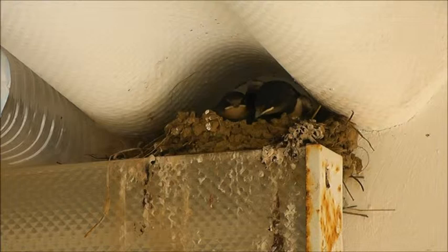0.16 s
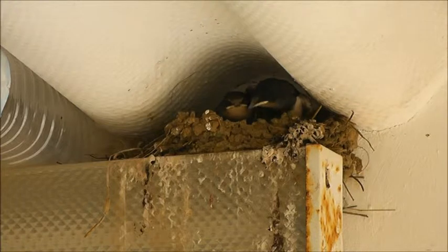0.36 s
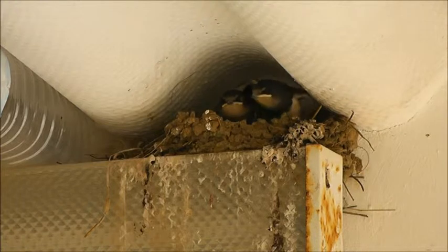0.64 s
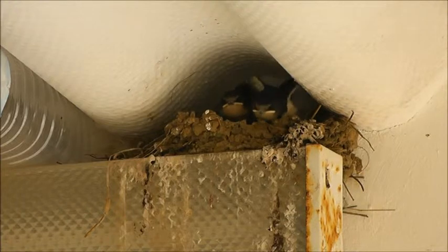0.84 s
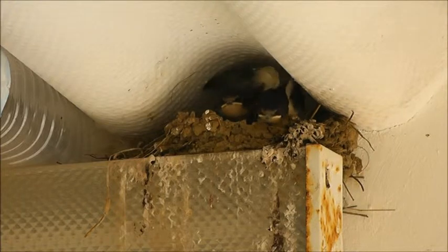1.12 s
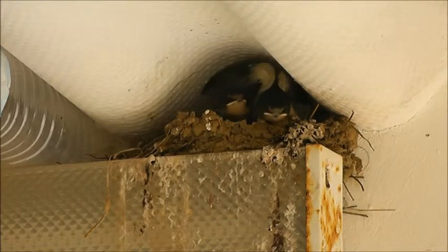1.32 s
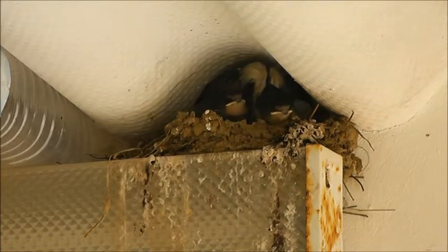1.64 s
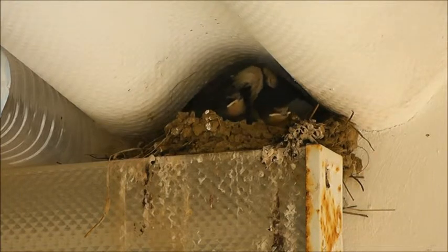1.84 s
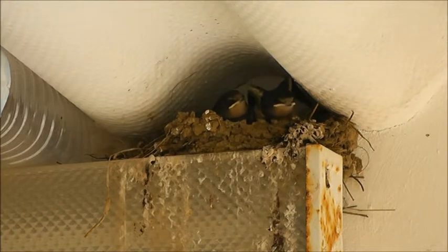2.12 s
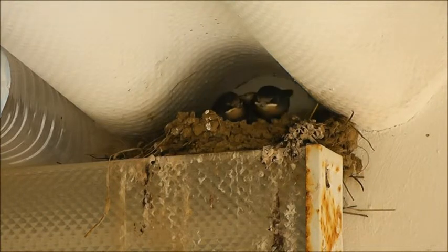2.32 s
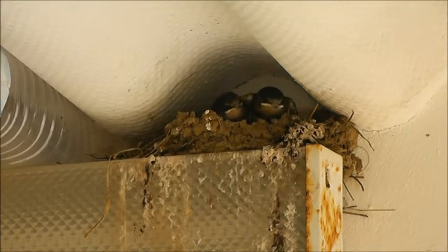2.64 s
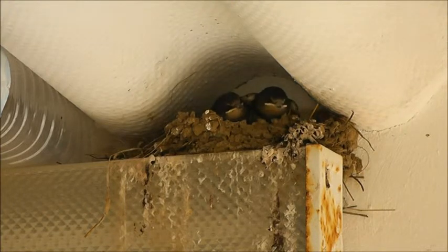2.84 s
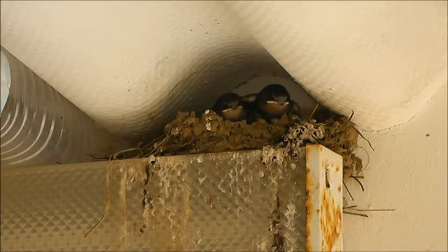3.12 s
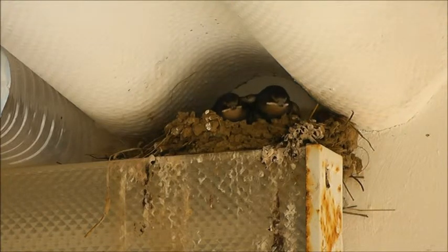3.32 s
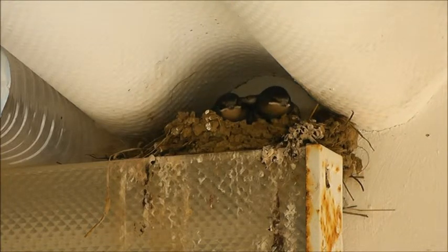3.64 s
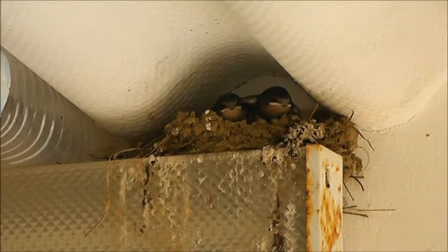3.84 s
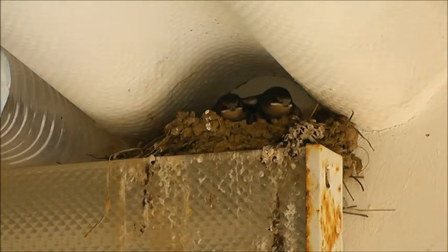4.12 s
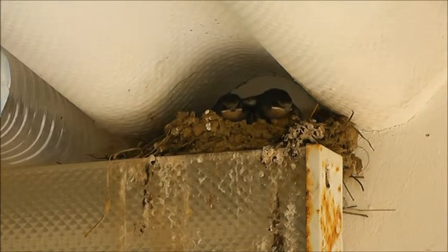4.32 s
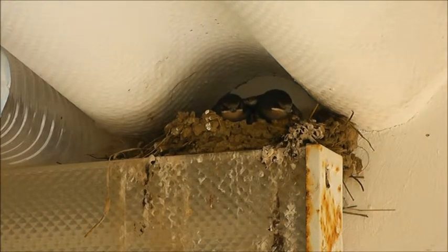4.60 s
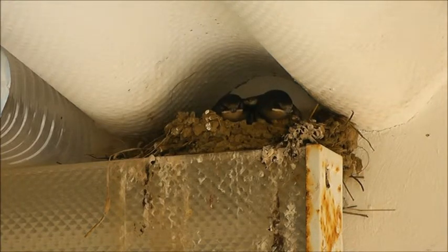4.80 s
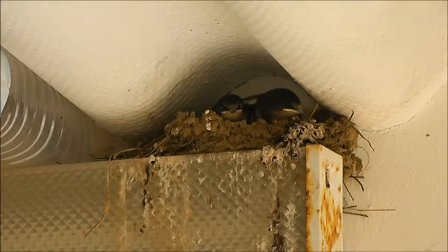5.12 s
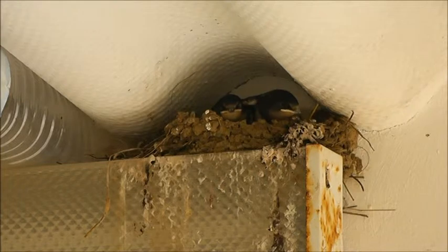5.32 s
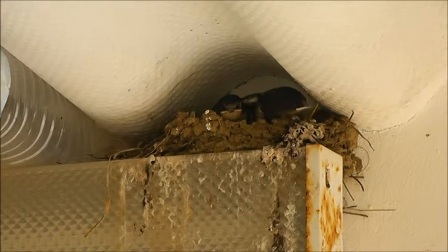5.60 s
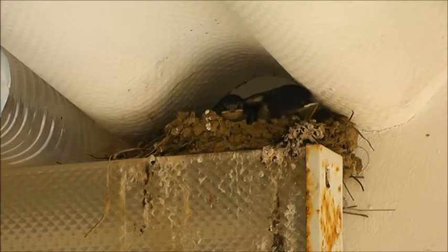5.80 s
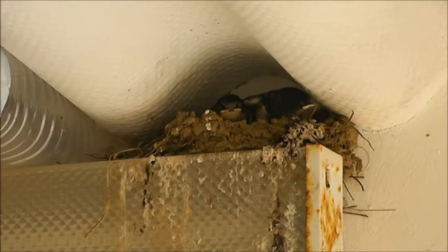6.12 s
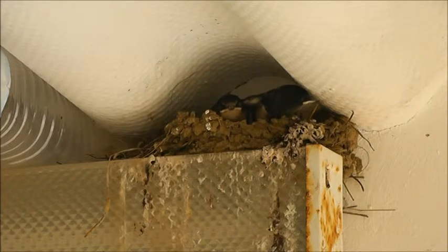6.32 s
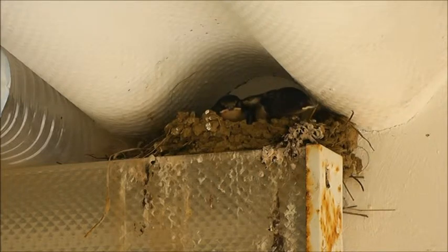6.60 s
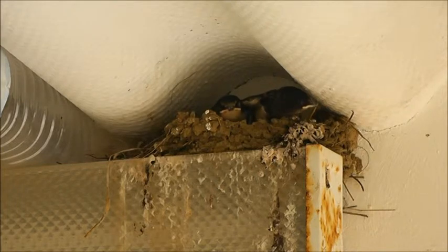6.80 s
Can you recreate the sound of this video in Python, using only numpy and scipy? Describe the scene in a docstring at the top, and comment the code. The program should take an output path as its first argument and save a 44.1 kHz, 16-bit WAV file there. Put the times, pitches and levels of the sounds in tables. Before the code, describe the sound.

Close to a swallows' mud nest under a roof, a bird gives four short, sharp upward chirps, spaced more than a second apart, with faint dry nest rustles. Farther away a small bird sings quick falling notes and a thin buzz, while one soft low thump sounds. After the fourth chirp, a fast raspy twitter of squeaks, pips and gurgles runs to the end. Hard walls add a short ring over quiet outdoor rumble and hiss.

```python
"""Outdoors, a quiet rumble and hiss of coloured noise; close by, swallows at a mud nest under a corrugated roof.
An adult gives four sharp rising calls, each a rasp breaking into two whistles that mix; the nest rustles.
Farther off a small bird sings gliding down-slurs, then a swept buzz; one soft low thump of noise and boom falls.
After the fourth call a fast raspy twitter runs: chopped whistles, pips, squeaks and gurgles.
The hard porch walls add a short ring of decaying noise bands."""
import sys
import numpy as np
from scipy import signal
from scipy.fft import rfft, irfft
from scipy.io import wavfile
from scipy.ndimage import uniform_filter1d

SR = 44100
rng = np.random.default_rng(int(sys.argv[2]) if len(sys.argv) > 2 else 0)


def put_to_file(sound):
    """Save the sound as 16-bit audio at rate SR, in the file named by the first command-line argument."""
    columns = np.atleast_2d(sound).T  # one column per channel
    safe = np.clip(columns, -1, 1)
    whole_steps = np.round(safe * 32767)
    wavfile.write(sys.argv[1], SR, whole_steps.astype(np.int16))


N = 306495
TIME = np.arange(N) / SR
CUTOFF_HZ = 15650
MID_SIDE = np.array([[1], [-1]])   # a side signal enters left and right with opposite sign


def from_db(db):
    """Decibels to gain."""
    return 10 ** (np.asarray(db) / 20)


def rms_one(x):
    """Scale to unit rms."""
    return x / np.sqrt(np.mean(x ** 2) + 1e-20)


def at_hz(points, hz):
    """Read a table on a log-frequency axis."""
    f, value = np.transpose(points)
    return np.interp(np.log(np.maximum(hz, 1)), np.log(f), value)


def wander(rate_hz):
    """Smooth random motion with spread 1."""
    return rms_one(signal.sosfilt(signal.butter(2, rate_hz, fs=SR, output="sos"), rng.standard_normal(N)))


def noise(spectrum, grain_db=0):
    """Unit noise with a given colour, from a source that may sputter."""
    source = rng.standard_normal(N)
    if grain_db:
        source = source * from_db(grain_db * np.tanh(wander(300)))
    colour = from_db(at_hz(spectrum, np.fft.rfftfreq(N, 1 / SR)))
    return rms_one(irfft(rfft(source) * colour, N))


def span(start, end):
    """The samples between two times."""
    return slice(max(int(start * SR), 0), min(int(end * SR), N))


def phase_of(hz):
    """Running phase of a moving pitch."""
    return 2 * np.pi * np.cumsum(hz) / SR


def gate(start, end, edge_s):
    """Swell in, hold, die away."""
    return np.clip(np.minimum(TIME - start, end - TIME) / edge_s + .5, 0, 1)


def pips(rows, arch, jitter, octave_db):
    """Near-pure notes whose pitch arches with the blowing pressure; low ones are rougher."""
    out, shake = np.zeros(N), wander(560)
    for centre, length, hz, db in rows:
        part = span(centre - length, centre + length)
        u = (TIME[part] - centre) / (length / 2)
        rough = jitter * max(3800 / hz, 1) ** 2.87
        phase = phase_of(hz * (1 - arch * u ** 2 + rough * shake[part]))
        tone = np.sin(phase)
        tone = tone + from_db(octave_db) * np.sin(2 * phase)
        tone = tone + from_db(octave_db - 24) * np.sin(3 * phase)
        envelope = np.exp(-1.3 * np.abs(u) ** 3)
        out[part] += np.sqrt(2) * from_db(db) * envelope * tone
    return out


# colour of the open air beyond the porch: (f/Hz, relative level/dB)
AIR_COLOUR = [(15, -51), (25, -40), (39, -13.5), (96, -4.5), (193, -7), (322, -2.5), (631, -9.5), (703, -9),
              (1300, -13), (1450, -14.5), (2120, -15.5), (2700, -18.5), (4750, -15.5), (10100, -31.5),
              (15500, -39.5)]
# how alike the two microphones hear it: (f/Hz, left-right correlation)
AIR_LIKENESS = [(30, .15), (100, 0.011), (500, 0.017), (2000, 0.4), (5000, 1), (14000, 0.4)]
AIR_DB = -57.5   # level of the part common to both sides


def outdoors():
    """Steady distant rumble and hiss, wide in the bass."""
    alike = np.clip(at_hz(AIR_LIKENESS, np.fft.rfftfreq(N, 1 / SR)), -.9, .99)
    side = irfft(rfft(noise(AIR_COLOUR)) * np.sqrt((1 - alike) / (1 + alike)), N)
    return from_db(AIR_DB) * (noise(AIR_COLOUR) + side * MID_SIDE)


# near calls, one whistle from each side of the syrinx, levels before shaping and mix:
# (top t/s, glide t/s, low top f/Hz, high top f/Hz, low level/dB, high level/dB, rasp level/dB)
SHARP_CALLS = [ (0.211, .050, 3010, 4210, -34.5, -38, -41), (1.811, 0.063, 3050, 4112, -36, -27.5, -37.5),
               (3.100, .042, 3200, 4287, -28.5, -23.5, -33.5), (4.545, 0.042, 3240, 4340, -31, -19, -34.5)]
# colour of their rasp: (f/Hz, relative level/dB)
CALL_RASP_COLOUR = [(500, -22), (1100, -4.5), (1700, -8.5), (2400, -2), (3300, 6), (4400, 9), (5600, 0),
                    (7200, -6), (8500, -21), (11000, -23), (13500, -15), (15500, -43)]
# tones that the two whistles make together: (multiple of low, multiple of high, relative level/dB)
COMBINATION_TONES = [ (-1, 1, -18), (2, 0, -5.5), (-1, 2, -10), (1, 1, -10), (0, 2, -27.5), (3, 0, -20.5),
                     (2, 1, -28.5), (1, 2, -23), (0, 3, -24)]
LOW_START, HIGH_START = .73, .785   # each whistle starts at this share of its top pitch
USUAL_CALL_DB = -26   # reference for the high whistle
MIX_DB, MIX_FOLLOWS = -35, .17   # combination tones in a usual call; share of the call's level each order follows


def sharp_calls(swell_db, fade_s, jitter, lead_s, rasp_rise_s, throb):
    """A rasp breaks into two rising whistles, which mix into sum and difference tones."""
    out, rasp = np.zeros(N), noise(CALL_RASP_COLOUR, grain_db=10.5)
    low_shake, high_shake = wander(240), wander(330)
    for top, glide, low_top, high_top, low_db, high_db, rasp_db in SHARP_CALLS:
        part = span(top - .13, top + .05)
        t = TIME[part] - top
        climb = np.clip(1 + t / glide, 0, 1)
        bend = np.sin(np.pi / 2 * climb ** 1.08) ** 2
        low_hz = low_top * (LOW_START + (1 - LOW_START) * bend)
        high_hz = high_top * (HIGH_START + (1 - HIGH_START) * bend)
        low = phase_of(low_hz * (1 + jitter * low_shake[part]))
        high = phase_of(high_hz * (1 + jitter * high_shake[part]))
        # a harder call is brighter
        push_db = high_db - USUAL_CALL_DB
        mixed = sum(from_db(MIX_DB + db + MIX_FOLLOWS * push_db * (m + n)) * np.sin(round(m) * low + round(n) * high)
                    for m, n, db in COMBINATION_TONES)
        pair = from_db(low_db) * np.sin(low) + from_db(high_db) * np.sin(high)
        swell = from_db(-swell_db * (1 - climb) ** 2)
        # every other beat of the pair is stronger, which sets lines halfway between the tones
        voice = (swell * pair + mixed) * (1 + throb * np.sin((high - low) / 2))
        onset = np.exp(-(np.minimum(t + glide - .006, 0) / 0.011) ** 2)
        opening = np.clip((t + glide + lead_s) / rasp_rise_s, 0, 1)
        release = np.exp(-(np.maximum(t, 0) / fade_s) ** 2)
        out[part] += release * (np.sqrt(2) * onset * voice + from_db(rasp_db) * opening * rasp[part])
    return out


TICK_AHEAD_S, TICK_S, TICK_HZ = .077, .006, 4250
TICK_DB, TICK_FOLLOWS = -44, 0.56   # level before a usual call; share of the call's level it follows


def call_ticks():
    """A tiny pip announces each sharp call: (centre t/s, length t/s, f/Hz, level/dB)."""
    return [(top - TICK_AHEAD_S, TICK_S, TICK_HZ, TICK_DB + TICK_FOLLOWS * (high_db - USUAL_CALL_DB))
            for top, *_, high_db, _ in SHARP_CALLS]


# thin whistles of the farther bird: (centre t/s, length t/s, f/Hz, level/dB before ring and mix)
FAR_WHISTLES = [(0.395, 0.028, 3680, -67), (0.435, 0.046, 4100, -58.5), (0.945, 0.018, 4730, -54),
                (1.226, 0.042, 6400, -53), (1.478, 0.035, 5200, -49), (2.048, 0.035, 7060, -51.5),
                (2.076, 0.05, 4470, -42.5), (2.445, 0.11, 5275, -49.5), (2.545, 0.024, 5470, -43),
                (2.588, .014, 5400, -52), (2.770, .03, 5250, -42), (4.19, 0.15, 2190, -66),
                (4.27, .09, 3370, -70)]


def far_whistles():
    """The farther bird's thin notes arch in pitch with the blowing pressure."""
    return pips(FAR_WHISTLES, arch=0.032, jitter=0.0336, octave_db=-28)


# colour of the soft rustle in the nest: (f/Hz, relative level/dB)
RUSTLE_COLOUR = [(1500, -28), (3500, 1), (6800, 10), (9000, -19), (15000, -19)]
# rustles and tiny ticks in the nest: (centre t/s, fade length t/s, level/dB before ring and mix)
NEST_RUSTLES = [(0.533, 0.058, -62.5), (0.75, 0.2, -70), (1.143, 0.055, -59.5), (1.34, 0.051, -56.5),
                (1.476, .071, -58.5), (3.416, 0.002, -59), (3.617, .002, -55), (3.82, .1, -69),
                (4.122, 0.0024, -53.5)]


def rustles():
    """Feathers and claws brush the dry nest: sputtering noise in smooth bursts."""
    level = sum(from_db(db) * np.exp(-((TIME - s) / length) ** 2) for s, length, db in NEST_RUSTLES)
    return noise(RUSTLE_COLOUR, grain_db=6.0) * level


# the farther bird's down-slurs, in two runs: (start t/s)
SLUR_STARTS = [1.232, 1.341, 1.445, 1.536, 1.624, 1.700, 1.837, 1.906, 1.971, 2.587, 2.635, 2.68, 2.719,
               2.802, 2.834, 2.869, 2.905, 2.946]
# its song climbs, swells and fades: (t/s, slur top f/Hz, slur bottom f/Hz, level/dB before ring and mix)
SONG_COURSE = [(1.23, 6470, 4180, -47), (1.65, 6770, 4080, -42), (1.97, 6970, 4190, -42.5),
               (2.59, 7720, 5310, -48.5), (2.8, 8830, 5300, -46.5), (2.95, 9020, 5240, -55)]


def slurs(length_s, fall_s, hook_db):
    """Each slur dives quickly, then lingers in a hook at its lowest pitch; wider dives take longer."""
    out, shake = np.zeros(N), wander(300)
    s, *song = np.transpose(SONG_COURSE)
    for start in SLUR_STARTS:
        high_hz, low_hz, db = (np.interp(start, s, column) for column in song)
        part = span(start, start + length_s)
        t = TIME[part] - start
        dive_s = fall_s * (high_hz - low_hz) / 2500   # fall_s is for a drop of 2500 Hz
        dive = np.clip(1 - t / dive_s, 0, 1)
        pitch = (low_hz + (high_hz - low_hz) * dive ** 1.3) * (1 + 0.015 * shake[part])
        level = from_db(db + hook_db * (dive == 0)) * signal.windows.tukey(len(t), .3)
        out[part] += np.sqrt(2) * uniform_filter1d(level, size=100) * np.sin(phase_of(pitch))
    return out


# the farther bird's buzzes, each higher than the last: (start t/s, end t/s, level/dB before sweep and mix)
BUZZES = [(2.054, 2.23, -44.5), (2.264, 2.332, -43.5), (2.374, 2.46, -48), (2.63, 2.75, -51.5)]
# their centre pitch: (t/s, f/Hz)
BUZZ_CENTRE = [(2.06, 4740), (2.2, 4867), (2.3, 5610), (2.75, 6450)]


def buzz(rate_hz, depth, jitter):
    """A whistle swept rapidly up and down, its level pulsing with the sweep."""
    swing = phase_of(rate_hz * (1 + 0.15 * wander(31.9)))
    centre_hz = np.interp(TIME, *np.transpose(BUZZ_CENTRE))
    pitch = centre_hz * (1 + depth * np.sin(swing) + jitter * wander(685))
    level = sum(from_db(db) * gate(start, end, edge_s=0.043) for start, end, db in BUZZES)
    return level * (1 - 0.86 * np.cos(swing)) * np.sin(phase_of(pitch))


# colour of the distant thump: (f/Hz, relative level/dB)
THUMP_COLOUR = [(35, -25), (65, -5), (100, -7), (150, -5), (260, -1.5), (370, -12.5), (500, -14),
                (900, -41.5)]


def thump(start_s, push_s, level_db, t60_s, boom_hz, boom_db, boom_t60_s):
    """A soft distant knock: a dull rumble dies away around one booming mode."""
    t = np.maximum(TIME - start_s, 0)
    rumble = noise(THUMP_COLOUR) + noise(THUMP_COLOUR) * MID_SIDE
    rumble = rumble * from_db(level_db - 60 * t / t60_s)
    boom = np.sin(2 * np.pi * boom_hz * t) * from_db(boom_db) * np.exp(-np.log(1000) * t / boom_t60_s)
    return (1 - np.exp(-t / push_s)) * (rumble + boom)


def high_whistle(start_s, end_s, pitch_hz, level_db, jitter, flicker_db):
    """The far bird holds a thin, flickering second voice above its buzzes."""
    level = from_db(level_db + flicker_db * np.tanh(wander(22))) * gate(start_s, end_s, edge_s=.015)
    return level * np.sin(phase_of(pitch_hz * (1 + jitter * wander(590))))


# swells of the distant low background: (centre t/s, fade length t/s, f/Hz, level/dB before random sway)
RUMBLE_SWELLS = [(3.864, 0.2, 329, -61), (5.1, 0.36, 143.4, -67), (5.263, 0.11, 243, -56),
                 (6.006, 0.59, 323.7, -62.5)]


def swells(width_hz):
    """Narrow bands of the distant rumble come and go, differently at each microphone."""
    slow = [wander(width_hz) + 1j * wander(width_hz) for channel in range(2)]
    out = np.zeros((2, N))
    for s, length, hz, db in RUMBLE_SWELLS:
        part = span(s - 2 * length, s + 2 * length)
        t = TIME[part] - s
        sway = slow[0][part] + 0.56 * slow[1][part] * MID_SIDE
        band = np.real(sway * np.exp(2j * np.pi * hz * t))
        out[:, part] += from_db(db) * np.exp(-(t / length) ** 2) * band
    return out


# short arched pips at the nest: (centre t/s, length t/s, f/Hz, level/dB before ring and mix)
NEAR_PIPS = [(4.496, .015, 4250, -29.5), (4.594, .022, 3830, -37), (5.141, 0.0064, 3690, -33),
             (5.331, 0.0086, 3800, -28), (5.420, 0.0059, 4170, -24.5), (5.621, 0.0062, 3660, -25),
             (5.672, .022, 2720, -34), (5.907, .012, 3870, -22), (6.061, 0.016, 3940, -25.5),
             (6.530, 0.031, 3045, -37.5), (6.698, 0.025, 3850, -29.5), (6.894, 0.0066, 3610, -26.5)]


def near_pips():
    """All near-pure notes close by: ticks, pips, squeak tops and gurgles."""
    rows = NEAR_PIPS + squeak_tops() + call_ticks() + gurgles()
    return pips(rows, arch=.075, jitter=0.007, octave_db=-27.5)


# raspy syllables at the nest, levels before shaping and mix:
# (top t/s, glide t/s, top f/Hz, whistle level/dB, upper sideband level/dB)
TWITTER_SYLLABLES = [ (4.600, .012, 4900, -28, -47), (4.692, 0.0081, 4035, -24, -26),
                     (4.72, .014, 4267, -21.5, -23), (4.882, 0.0281, 4885, -26.5, -37.5),
                     (5.231, 0.024, 4350, -19, -33.5), (5.342, 0.0321, 4640, -24, -48),
                     (5.368, 0.0098, 3890, -23, -19), (5.471, .020, 4593, -19.5, -27.5),
                     (5.762, 0.018, 3910, -29.5, -31), (5.847, 0.028, 4583, -26.5, -42),
                     (5.998, 0.0284, 4347, -17, -34), (6.285, 0.023, 4360, -18.5, -26.5),
                     (6.625, 0.0105, 4057, -17.5, -28.5), (6.754, 0.026, 4270, -22, -27),
                     (6.841, 0.036, 4330, -30.5, -48), (6.946, 0.028, 4070, -27, -30.5)]
# the rasp under them: (t/s, level/dB before shaping and mix)
RASP_COURSE = [(4.7, -35), (5.2, -31.5), (5.45, -27.5), (5.7, -29), (6.7, -26.5), (6.95, -29)]
CHOP_HZ = 1370   # the whistle is chopped at the whole fraction of its pitch chosen near this


def chopped_syllables():
    """Rows: (top t/s, glide t/s, top f/Hz, sideband spacing f/Hz, whistle, sideband and rasp level/dB)."""
    rasp = np.transpose(RASP_COURSE)
    return [(s, glide, hz, hz / round(hz / CHOP_HZ), db, side_db, np.interp(s, *rasp))
            for s, glide, hz, db, side_db in TWITTER_SYLLABLES]


# colour of the twitter's rasp: (f/Hz, relative level/dB)
TWITTER_RASP_COLOUR = [(700, -53), (1500, -14.5), (2200, -17), (2900, 0.5), (4000, 5.5), (5400, 5.5),
                       (6200, -2.5), (7300, -7), (8500, -18.5), (11000, -22.5), (13000, -33), (15500, -38)]
# colour of the thin wheeze that leads into each syllable: (f/Hz, relative level/dB)
WHEEZE_COLOUR = [(900, -38.5), (2000, -9), (2800, 2), (3900, 5), (5400, 0.5), (6200, -6), (7500, -16),
                 (10000, -28.5), (15000, -46)]
# the throat shuts out a lower sideband that falls too deep: (f/Hz, level/dB before shaping)
LOWER_SIDEBAND = [(2400, -84), (2950, -33), (3700, -36.5)]
SYLLABLE_START = .88   # a syllable starts at this share of its top pitch
ONSET_SHARE = 0.49   # the whistle fades in on that pitch, over this share of its glide time
WHEEZE_LEAD_S, WHEEZE_SHARE = 0.065, 0.5   # lead-in before the glide; most of a pause that lead and glide may fill
RASP_RECOVERY_S = 0.053   # pause needed for a full rasp


def twitter(swell_db, hold_s, fade_s, slope_db, jitter, flutter, lead_db, crest_s, grain_db):
    """A rising whistle, chopped by the other side of the syrinx into sidebands, grows out of a rasp."""
    out, shake, wobble = np.zeros(N), wander(683), wander(560)
    shimmer = from_db(1.8 * wander(220))
    rasp, wheeze = noise(TWITTER_RASP_COLOUR, grain_db), noise(WHEEZE_COLOUR, grain_db)
    rows = sorted(chopped_syllables() + squeak_glides())
    pauses = np.diff([row[0] for row in rows], prepend=0)
    for (top, glide, top_hz, gap_hz, tone_db, high_db, rasp_db), pause in zip(rows, pauses):
        part = span(top - .13, top + .05)
        t = TIME[part] - top
        climb = np.clip(1 + t / glide, 0, 1)
        bend = np.sin(np.pi / 2 * climb ** 1.149) ** 2
        pitch = top_hz * (SYLLABLE_START + (1 - SYLLABLE_START) * bend)
        # the whistle is less steady until the pressure is up
        carrier = phase_of(pitch * (1 + jitter * (2 - climb) * shake[part]))
        beat = phase_of(gap_hz * (pitch / top_hz) ** .6 * (1 + flutter * wobble[part]))
        release = np.exp(-(np.maximum(t - hold_s, 0) / fade_s) ** 2)
        onset = np.exp(-(np.minimum(t + glide, 0) / (ONSET_SHARE * glide)) ** 2)
        effort = from_db(-swell_db * (1 - climb) ** 2) * onset * release * shimmer[part]
        # sidebands come out as the pressure peaks
        ladder = [(-1, at_hz(LOWER_SIDEBAND, top_hz - gap_hz))]
        ladder += [(k, high_db - slope_db * np.log2(k)) for k in range(1, 8)]
        sidebands = sum(from_db(db) * np.sin(carrier + k * beat)
                        for k, db in ladder if 0 < top_hz + k * gap_hz < CUTOFF_HZ)
        voice = from_db(tone_db) * np.sin(carrier) + from_db(-4 * (1.5 - climb)) * sidebands
        # a thin wheeze opens into a broad rasp that crests with the whistle; both need a pause to build
        crest = np.exp(-np.abs(t) / crest_s)
        hiss = crest * rasp[part] + from_db(lead_db) * (1 - crest) * wheeze[part]
        lead = min(glide + WHEEZE_LEAD_S, WHEEZE_SHARE * pause)
        opening = np.clip((t + lead) / 0.017, 0, min(1, pause / RASP_RECOVERY_S))
        out[part] += np.sqrt(2) * voice * effort + from_db(rasp_db) * hiss * opening * release
    return out


# squeaks in the twitter, a soft glide that breaks into a loud pip:
# (t/s, pip length t/s, glide top f/Hz, pip f/Hz, pip level/dB before ring and mix)
SQUEAK_NOTES = [(5.059, 0.0071, 3133, 3580, -24), (5.65, 0.0071, 3280, 3724, -18.5),
                (6.101, .012, 3700, 3810, -17), (6.129, .013, 3700, 3800, -17.5),
                (6.46, .011, 3440, 3475, -20.5)]
SQUEAK_GLIDE_S, SQUEAK_GLIDE_DB, SQUEAK_OCTAVE_DB = .021, -32, -38.5
SQUEAK_RASP_DB = -2.5   # relative to the other syllables


def squeak_glides():
    """The soft glides, unchopped, as syllable rows whose sideband spacing is the pitch itself."""
    rasp = np.transpose(RASP_COURSE)
    return [(s, SQUEAK_GLIDE_S, hz, hz, SQUEAK_GLIDE_DB, SQUEAK_OCTAVE_DB, np.interp(s, *rasp) + SQUEAK_RASP_DB)
            for s, _, hz, _, _ in SQUEAK_NOTES]


def squeak_tops():
    """The loud pips the glides break into: (centre t/s, length t/s, f/Hz, level/dB)."""
    return [(s, length, hz, db) for s, length, _, hz, db in SQUEAK_NOTES]


# a low throaty gurgle comes twice under the twitter: (t/s, level/dB before note levels and mix)
GURGLE_TIMES = [(5.757, -39.5), (6.745, -37.5)]
# its notes: (delay t/s, length t/s, f/Hz, relative level/dB)
GURGLE_PARTS = [(-.002, 0.0263, 1900, -1.5), (.015, .033, 1580, -9.5), (.068, 0.055, 2160, -1),
                (.064, 0.038, 2650, 1.5), (.097, 0.036, 2490, 5.5)]


def gurgles():
    """Overlapping low notes in a throaty cluster: (centre t/s, length t/s, f/Hz, level/dB)."""
    return [(s + delay, length, hz, db + note_db)
            for s, db in GURGLE_TIMES for delay, length, hz, note_db in GURGLE_PARTS]


# ring of the porch walls: (f/Hz, time to fall 60 dB t/s)
PORCH_RING = [(1000, 0.23), (3000, 0.28), (4500, 0.24), (7000, 0.31), (13000, 0.087)]


def porch(x, wet_db, side_db, delay_s):
    """Dense wall reflections, each band with its own decay, nearly alike at the two close microphones."""
    t = TIME[:SR // 2]
    edges = np.geomspace(700, 16000, 8)
    white, tail = rng.standard_normal((2, len(t))), 0
    for low, high in zip(edges, edges[1:]):
        band = signal.sosfilt(signal.butter(2, [low, high], "band", fs=SR, output="sos"), white)
        tail = tail + band * from_db(-60 * t / at_hz(PORCH_RING, np.sqrt(low * high)))
    tail = tail * np.clip(t / delay_s - .5, 0, 1)
    tail = tail / np.sqrt(np.mean(np.sum(tail ** 2, axis=1)))
    mid, side = signal.fftconvolve(x[None], tail, axes=1)[:, :N]
    return x + from_db(wet_db) * (mid + from_db(side_db) * side * MID_SIDE)


def scene():
    """Near swallows and the far bird ring in the porch; the thump and the background stay outside it."""
    near = sharp_calls(swell_db=12, fade_s=0.0036, jitter=0.011, lead_s=0.031, rasp_rise_s=0.021, throb=.3)
    near = near + twitter(swell_db=6.5, hold_s=0.00043, fade_s=0.011, slope_db=15.0, jitter=0.011,
                          flutter=0.026, lead_db=-7.5, crest_s=0.028, grain_db=4)
    near = near + near_pips() + rustles()
    far = far_whistles() + slurs(length_s=0.02, fall_s=.012, hook_db=1)
    far = far + buzz(rate_hz=100, depth=0.146, jitter=0.0279)
    far = far + high_whistle(start_s=2.225, end_s=2.74, pitch_hz=7120, level_db=-55.5, jitter=0.0274, flicker_db=7.5)
    near = porch(near, wet_db=-7.5, side_db=-8.5, delay_s=.007)
    far = porch(far, wet_db=-1.0, side_db=-9, delay_s=0.00048)
    birds = from_db(-1.5) * near + from_db(-4.0) * far
    birds = birds * from_db([[-.35], [.35]])   # slightly to the right
    knock = thump(start_s=2.106, push_s=0.013, level_db=-48.5, t60_s=1.53,
                  boom_hz=101.6, boom_db=-45.0, boom_t60_s=1.0)
    return birds + knock + swells(width_hz=11) + outdoors()


def record(dry):
    """The top is cut steeply."""
    return signal.sosfilt(signal.ellip(10, .1, 80, CUTOFF_HZ, fs=SR, output="sos"), dry)


dry = scene()
out = record(dry)
put_to_file(out)
```